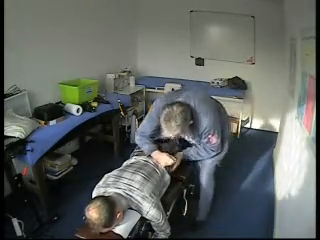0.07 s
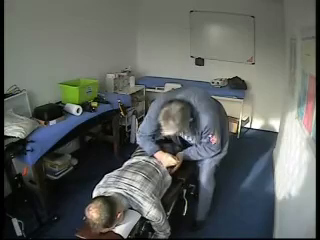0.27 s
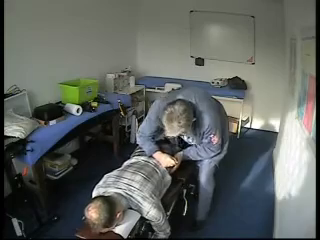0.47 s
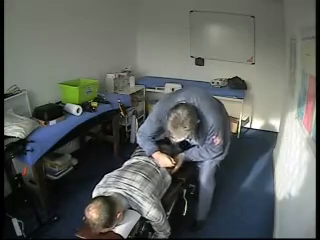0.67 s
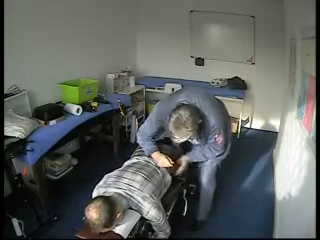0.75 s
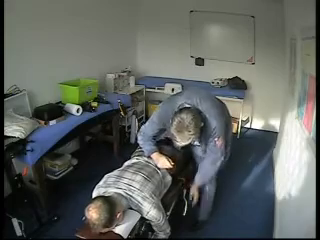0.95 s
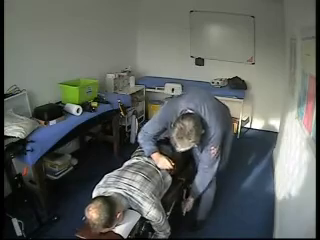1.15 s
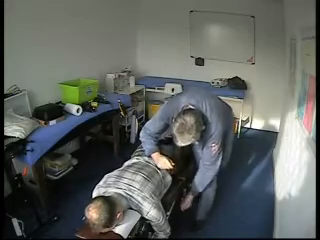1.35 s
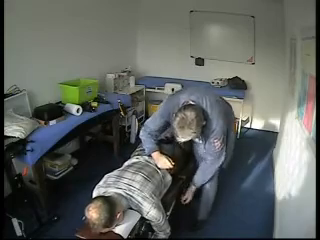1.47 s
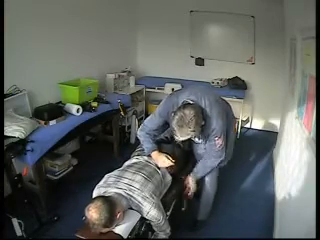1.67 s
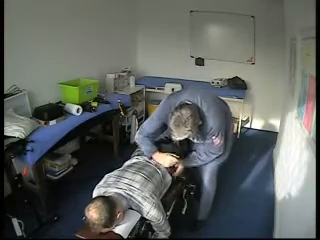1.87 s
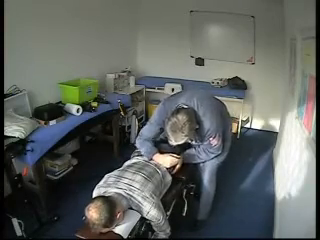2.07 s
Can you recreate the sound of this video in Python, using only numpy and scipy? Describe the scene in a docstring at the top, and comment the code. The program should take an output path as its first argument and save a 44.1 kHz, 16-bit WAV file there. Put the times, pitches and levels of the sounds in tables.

```python
"""Treatment table in a quiet room

A padded treatment table: a section drops and clatters, then a hand works the lever underneath.
Rough contacts ring wooden board and metal resonances and add unpitched crack and fizz.
Small pitched ticks and low booms swell and die; random echoes make the small room.
Under it all lie shaped noise for rumble and hiss, a rustle at the start, mains hum and a thin whine.
"""
import sys
import numpy as np
from scipy import signal
from scipy.fft import rfft, irfft
from scipy.io import wavfile
from scipy.ndimage import uniform_filter1d

SR = 44100
rng = np.random.default_rng(int(sys.argv[2]) if len(sys.argv) > 2 else 0)


def boost(x):
    """Linear amplitude factor 10**(x/20) for a level x in decibels (scalar or array-like)."""
    u = np.asarray(x, float) / 20
    return 10 ** u


def unload_wav(signal):
    """Save mono or channel-first audio to the path in sys.argv[1] as 16-bit WAV at rate SR, clipped to [-1, 1]."""
    wavfile.write(
        sys.argv[1],
        SR,
        np.round(np.clip(np.atleast_2d(signal).T, -1, 1) * 32767).astype(np.int16),
    )


N = 92610  # samples
HALVES = np.array([[.5], [-.5]])  # splits a left-right difference evenly over the two channels

# building rumble, spectrum shape: [f/Hz, relative level/dB]
RUMBLE_SHAPE = [(15, -8.5), (30, 6.5), (45, 7), (70, -32)]
# hiss, spectrum shape: [f/Hz, relative level/dB per Hz]
HISS_SHAPE = [(41, -17), (70, -5), (97, -7), (496, -14.5), (553, -15.5), (602, -17), (747, -18.5),
              (2390, -26), (6570, -35), (12000, -33.5), (15600, -71), (22000, -120)]
# hiss opposite in the channels, against the common hiss: [f/Hz, relative level/dB]
HISS_SIDE_SHAPE = [(30, -0.5), (100, -2.5), (300, -15), (1000, -19.5), (4000, -33), (12000, -40)]
# electronic whine, before the channel balance: [f/Hz, rms level/dB]
WHINE_TONES = [(6374, -97), (6424, -85), (6474, -96), (10325, -100)]
RUMBLE_DB, HISS_DB = -84, -71  # rms
RUSTLE_DB, RUSTLE_T60 = -62.5, 0.33  # starting level, seconds to fall 60 dB
HUM_HZ, HUM_DB, HUM_WAVER = 49.3, -61, 0.12  # rms before the waver, waver as rms share of the level
HUM_LEFT_DB, HUM_LEAD, WHINE_LEFT_DB = 2.5, 0.3, 9.5  # left over right; lead in radians

# decay of the room: [f/Hz, t60/s]
ROOM_DECAY = [(100, 0.28), (400, 0.49), (1500, 0.45), (4000, 0.37), (9000, 0.31)]
# what the walls give back: [f/Hz, relative level/dB]
WALL_TONE = [(100, -2), (400, -2.5), (1500, -2), (4000, -0.5), (10000, -3)]
ROOM_DB, ROOM_SIDE_DB = -8, -32  # tail against direct sound; opposite tail scaled from that
ECHO_SPREAD_DB = 3.5  # some reflections stand out

# frame rocking and floor booming, before the ports: [t/s, peak level/dB, f/Hz, swell time/s]
BOOM_EVENTS = [(.205, -46, 59, 0.0054), (.232, -37, 58.4, 0.012), (.315, -40.5, 66.2, 0.025),
               (.46, -55, 58.5, .025), (1.44, -49, 68.5, 0.02), (1.52, -53, 69, 0.033),
               (1.79, -78, 61.6, 0.042), (1.89, -54, 65.7, 0.054)]
# tiny pitched ticks and taps, before room and ports: [t/s, peak level/dB, f/Hz, swell time/s]
TICK_EVENTS = [(.0425, -41.5, 445, 0.0011), (.0435, -50, 940, 0.0011), (.885, -75.5, 3500, 0.0014),
               (0.95, -62.5, 2380, 0.00097), (1.705, -44.5, 1960, 0.00027), (1.964, -68.5, 9600, 0.0012)]

# blows on the table, before the trims and length weighting below:
# [t/s, blow level/dB, board knock level/dB, metal treble level/dB, contact decay time/ms]
# board and metal levels are relative to the blow
TABLE_BLOWS = [(0.031, -70, 3, -4, 21), (.154, -45, 0.5, -15, 0.16), (.179, -44, 6.5, -10, 11),
               (.195, -44, 5.5, -3.5, 11.4), (.206, -21.5, -27, -7, 1.16), (.2085, -17, -0.5, -18, 1.06),
               (.211, -32, 11, -4.5, 3.4), (.219, -28, 10, -13, 1.05), (.225, -38, -7, 4.5, 1.1),
               (.231, -39, -13, 0.5, 4.3), (0.2357, -18.5, 2.5, -12.5, 1.14), (.244, -45, -1, -30, 2.8),
               (0.258, -55, -4, 4, 3.4), (0.2732, -38.5, 0, -9.5, 2.9), (.299, -36.5, -4, -13.5, 1.6),
               (0.317, -43.5, -9, -4, 2.2), (0.333, -48, 12.5, -10, 4.4), (.487, -54, 7.5, -11.5, 0.79),
               (.715, -82.5, -11, 11, 2.3), (0.889, -72.5, 5.5, -14, 13), (1.012, -64, 2.5, -14, 1.),
               (1.091, -80, 17, -4, 13), (1.174, -57.5, 5.5, -5.5, 3.9), (1.187, -47, 4, -7.5, 3.7),
               (1.197, -54.5, 8, -17.5, 20), (1.221, -64, 20, -3.5, 6.7), (1.248, -48.5, 1.5, -24, 3.),
               (1.295, -68, 16, -21, 12.), (1.36, -67, 10.5, -17, 45), (1.412, -55.5, 9.5, -0.5, 9),
               (1.425, -34.5, 4.5, -23, 2.8), (1.439, -28.5, -33, -25, 4.4), (1.4423, -30.5, 8, -7.5, 1.38),
               (1.456, -39.5, 4, -36, 11.5), (1.544, -47, -24, -115, 2), (1.595, -65.5, 20.5, 6.5, 4.),
               (1.6, -44.5, 2, -20, 6), (1.645, -48.5, 4.5, -3.5, 2.8), (1.655, -52, 1.5, -13, 8.3),
               (1.679, -52, -3, -17, 11), (1.792, -41.5, 6.5, -11.5, 6.9), (1.805, -40.5, 6, -10.5, 15),
               (1.835, -48.5, 4.5, -14, 24), (1.874, -58, 13, -7.5, 6.6), (1.924, -58.5, 16.5, -23, 2.4),
               (2.038, -45.5, 2, -10.5, 17), (2.057, -46, 6, -14.5, 13.5), (2.084, -47, -8, -8.5, 3.)]
# resonances of the board, before each blow's variation: [f/Hz, relative level/dB, t60/s]
BOARD_MODES = [(167, -10.5, 0.2), (205, -11.5, 0.17), (244, 5, 0.023), (316, 3.5, 0.05),
               (383.5, 11.5, 0.043), (422, 2.5, 0.073), (510, -1, 0.038)]
# resonances of the frame, varied likewise: [f/Hz, relative level/dB, t60/s]
FRAME_MODES = [(685, 12, 0.0089), (900, 14.5, 0.0086), (1144, 10, 0.01), (1450, -7.5, 0.2),
               (1765, 1, 0.085), (1910, -0.5, .03), (2634, -16.5, .02)]
# resonances of the metal, varied likewise: [f/Hz, relative level/dB, t60/s]
METAL_MODES = [(3450, 0, .008), (4300, -2, .006), (6350, -6, .006)]
# unpitched mid crack, spectrum shape: [f/Hz, relative level/dB]
CRACK_SHAPE = [(300, -11), (700, 6), (1500, 4.5), (2600, -3.5), (4500, -24)]
# unpitched treble fizz, spectrum shape: [f/Hz, relative level/dB]
FIZZ_SHAPE = [(1500, -16.5), (2600, -3.5), (3500, 10), (5000, 3.5), (8000, -4.5), (10500, -18.5),
              (12000, -55)]
BOARD_DB, FRAME_DB, METAL_DB, CRACK_DB, FIZZ_DB = 3.5, -2, -5.5, 3, 4.5  # layer trims
SPREAD_DB, DETUNE = 4, 0.025  # spread of each mode's level and of its pitch as a share
RISE_SHARE = 0.24  # rise time of a contact as a share of its decay time
STRIKE = 0.69  # sharp strike against rough grit, for a 1 ms contact
MIN_CONTACT_MS, LOW_CUT_HZ = 0.2, 107
LEAD_IN = 256  # samples of silence before a contact, room for the filters to spread backwards

# microphone port balance: [f/Hz, left minus right level/dB]
PORT_BALANCE = [(40, -4.5), (100, -7.5), (190, -1.5), (350, -1.1), (700, 0), (12000, 0.5)]
# microphone port phase: [f/Hz, lead of the left/rad]
PORT_LEAD = [(40, 1), (100, 0.85), (260, 0.51), (690, 0.2), (1550, 0.15), (12000, 0.055)]
EDGE_HZ = 10450


def evened(x):
    """Brings a signal to an rms of one."""
    return x / np.sqrt(np.mean(x ** 2) + 1e-20)


def read(points, hz):
    """Reads a curve between its points along a logarithmic frequency scale."""
    f, value = np.transpose(points)
    return np.interp(np.log(hz + 1), np.log(f + 1), value)


def add(mix, s, sound):
    """Lays a sound into the mix at s seconds."""
    part = mix[round(s * SR):][:len(sound)]
    part += sound[:len(part)]


def coloured(x, points):
    """Filters by a spectrum in dB, leaving the phase alone."""
    length = x.shape[-1]
    gain = boost(read(points, np.fft.rfftfreq(length, 1 / SR)))
    return irfft(rfft(x) * gain, length)


def rumble():
    """Low noise of the building, independent in the two channels."""
    return boost(RUMBLE_DB) * evened(coloured(rng.standard_normal((2, N)), RUMBLE_SHAPE))


def hiss_and_rustle():
    """Steady shaped noise, its common part lifted at the start by a rustle that dies away."""
    t = np.arange(N) / SR
    mid, side = evened(coloured(rng.standard_normal((2, N)), HISS_SHAPE))
    rustle = boost(RUSTLE_DB - 60 * (t / RUSTLE_T60) ** 2)
    common = np.hypot(boost(HISS_DB), rustle) * mid
    opposite = boost(HISS_DB) * coloured(side, HISS_SIDE_SHAPE)
    return common + 2 * HALVES * opposite


def hum():
    """A mains sine whose level wavers, louder and earlier on the left."""
    t = np.arange(N) / SR
    waver = 1 + HUM_WAVER * evened(uniform_filter1d(rng.standard_normal(N), size=3000))
    phase = 2 * np.pi * (HUM_HZ * t + rng.random()) + HUM_LEAD * HALVES
    return boost(HUM_DB + HUM_LEFT_DB * HALVES) * np.sqrt(2) * waver * np.sin(phase)


def whine():
    """Steady high electronic sines, leaning to the left."""
    t = np.arange(N) / SR
    tones = sum(boost(db) * np.sqrt(2) * np.sin(2 * np.pi * (hz * t + rng.random()))
                for hz, db in WHINE_TONES)
    return tones * boost(WHINE_LEFT_DB * HALVES)


def room(x):
    """Sparse random echoes, each band dying at its own speed; one tail common, one opposite."""
    taps = np.zeros((2, SR))
    # one echo at a random place in every 20 samples
    at = np.arange(200, SR - 20, 20) + rng.integers(0, 20, (2, (SR - 201) // 20))
    sign = rng.choice([-1., 1.], at.shape)
    standout = np.minimum(rng.exponential(1, at.shape), 4)
    np.put_along_axis(taps, at, sign * boost(ECHO_SPREAD_DB * standout), 1)
    hz, t, bands = signal.stft(taps, SR, nperseg=256)
    decay = boost(read(WALL_TONE, hz)[:, None] - 60 * t / read(ROOM_DECAY, hz)[:, None])
    tail = signal.istft(bands * decay, SR, nperseg=256)[1]
    tail = tail / np.linalg.norm(tail[0])
    mid, side = boost(ROOM_DB) * signal.fftconvolve(x[None], tail, axes=1)[:, :N]
    return mid, boost(ROOM_SIDE_DB) * side


def swelling_tones(events):
    """Sines that swell to their peak level at the swell time, then die: booms, ticks and taps."""
    out = np.zeros(N)
    for s, db, hz, swell in events:
        t = np.arange(round(10 * swell * SR)) / SR
        envelope = np.e * t / swell * np.exp(-t / swell)
        add(out, s, boost(db) * envelope * np.sin(2 * np.pi * hz * t))
    return out


def ring(modes, chance, t):
    """Decaying sines of a struck part, each a little louder, softer or detuned for this blow."""
    return sum(boost(db + SPREAD_DB * a - 60 * t / t60) * np.sin(2 * np.pi * hz * (1 + DETUNE * b) * t)
               for (hz, db, t60), (a, b) in zip(modes, chance))


def table():
    """Each blow is a short rough contact that rings board, frame and metal and cracks by itself."""
    out, t = np.zeros(N), np.arange(8192) / SR
    chances = rng.standard_normal((len(TABLE_BLOWS), 3, 8, 2))
    grits = rng.standard_normal((len(TABLE_BLOWS), 4096))
    for (s, db, board_db, metal_db, ms), chance, grit in zip(TABLE_BLOWS, chances, grits):
        length = max(ms, MIN_CONTACT_MS)
        u = t[:4096] * 1000 / length
        contact = grit * np.exp(-u) * (1 - np.exp(-u / RISE_SHARE))
        contact = contact / np.linalg.norm(contact)
        contact = np.pad(contact, (LEAD_IN, len(t) - 4096 - LEAD_IN))
        struck = contact.copy()
        struck[LEAD_IN] += STRIKE / length

        def rung(drive, modes, own):
            return signal.fftconvolve(drive, ring(modes, own, t))[:len(t)]

        layers = [
            (rung(struck, BOARD_MODES, chance[0]), board_db + BOARD_DB),
            (rung(contact, FRAME_MODES, chance[1]), FRAME_DB),
            (rung(contact, METAL_MODES, chance[2]), metal_db + METAL_DB),
            (coloured(struck, CRACK_SHAPE), CRACK_DB),
            (coloured(contact, FIZZ_SHAPE), metal_db + FIZZ_DB)]
        blow = sum(boost(db + trim) * layer / np.linalg.norm(layer) for layer, trim in layers)
        # longer contacts carry more energy
        add(out, s - LEAD_IN / SR, blow * np.sqrt((ms + 2) * SR / 8000))
    return out


def ports(x):
    """Two close microphone ports that differ in level and phase along the spectrum."""
    hz = np.fft.rfftfreq(N, 1 / SR)
    level = boost(HALVES * read(PORT_BALANCE, hz))
    turn = np.exp(1j * HALVES * read(PORT_LEAD, hz))
    return irfft(rfft(x) * level * turn, N)


def scene():
    """The table in its room, caught by the two ports, over the background."""
    background = rumble() + hiss_and_rustle() + hum() + whine()
    # the knocks lose their deep bass below the low cut
    low_cut = signal.butter(2, LOW_CUT_HZ, "high", fs=SR, output="sos")
    direct = signal.sosfilt(low_cut, table()) + swelling_tones(TICK_EVENTS)
    mid, side = room(direct)
    return ports(direct + mid + swelling_tones(BOOM_EVENTS)) + 2 * HALVES * side + background


def roll_off(x):
    """The treble ends steeply here."""
    return signal.sosfilt(signal.butter(12, 12370, fs=SR, output="sos"), x)


def record(dry):
    """Rolls the treble off steeply above the band edge and returns the finished mix."""
    low_pass = signal.butter(8, EDGE_HZ, fs=SR, output="sos")
    return roll_off(signal.sosfilt(low_pass, dry))


dry = scene()
out = record(dry)
unload_wav(out)
```